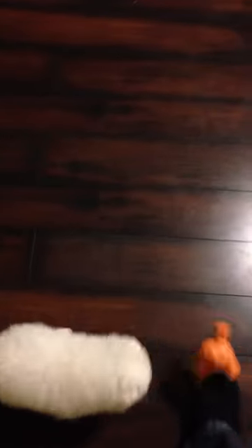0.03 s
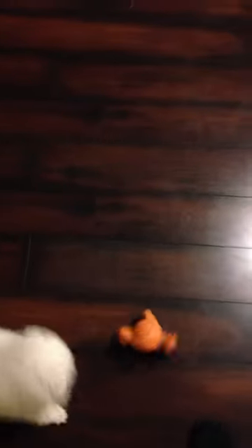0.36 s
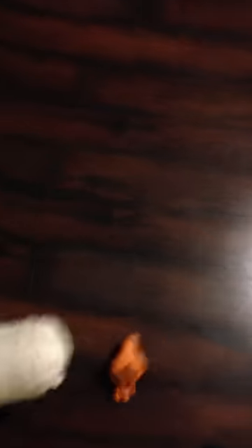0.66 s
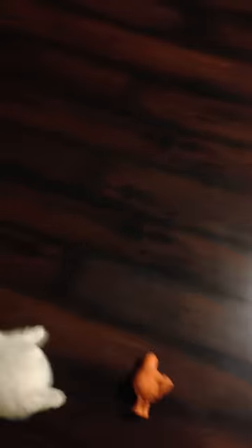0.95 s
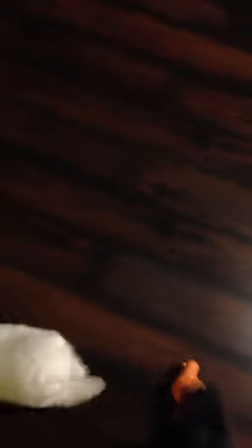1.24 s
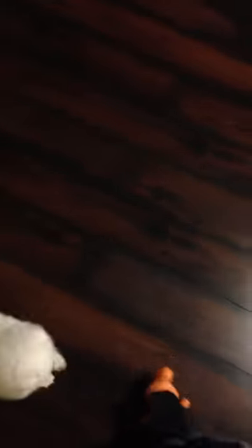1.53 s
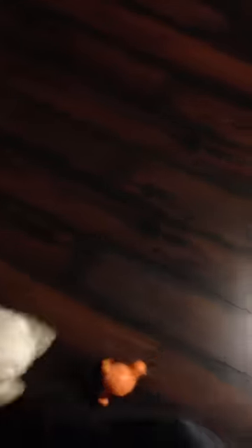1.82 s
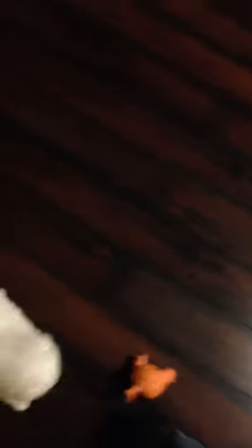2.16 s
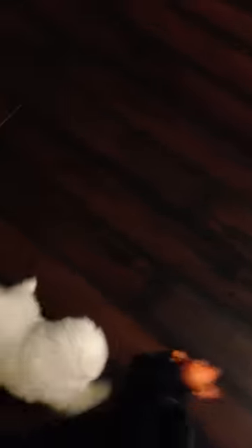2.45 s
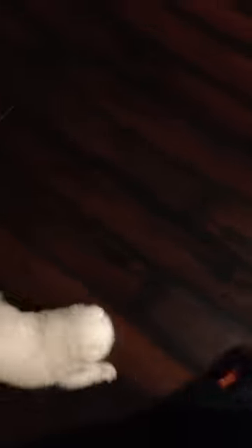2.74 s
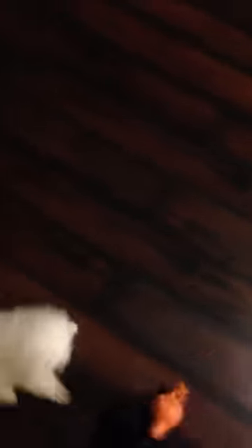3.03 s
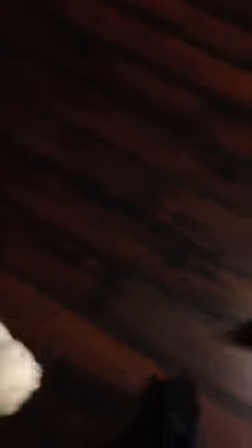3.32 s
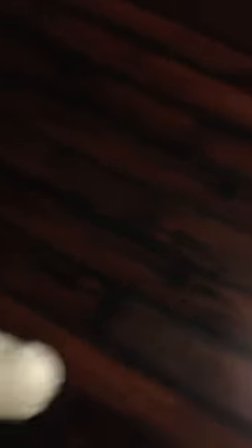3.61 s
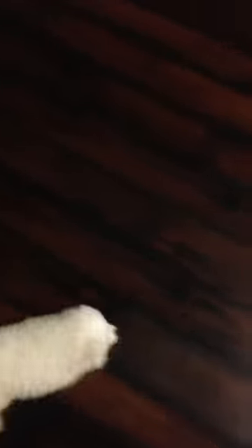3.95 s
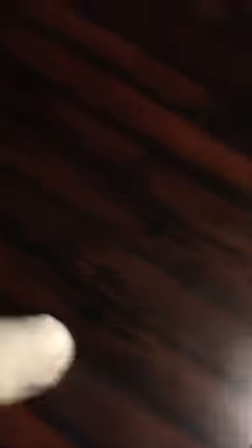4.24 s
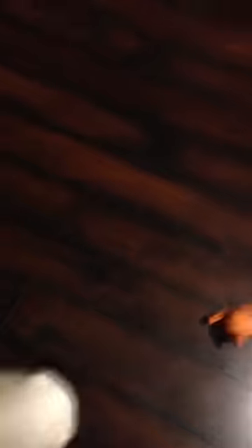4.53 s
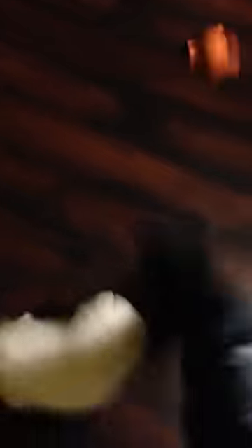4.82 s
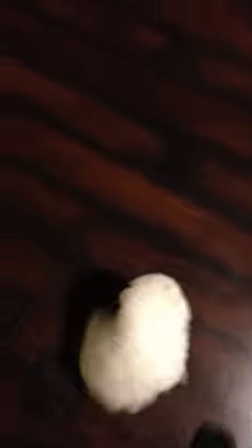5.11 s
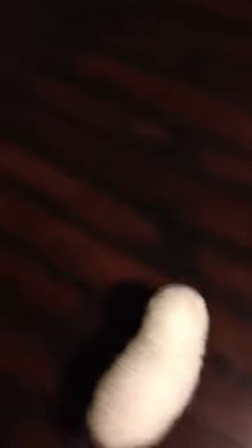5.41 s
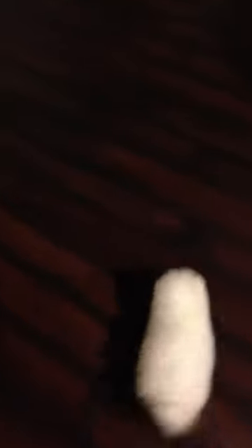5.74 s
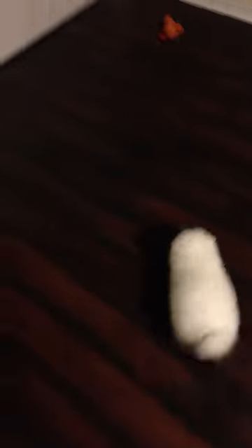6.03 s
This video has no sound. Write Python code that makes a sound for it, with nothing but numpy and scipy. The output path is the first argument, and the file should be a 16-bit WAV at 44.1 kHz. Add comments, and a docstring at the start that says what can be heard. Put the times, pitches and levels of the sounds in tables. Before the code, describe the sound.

From the start, short woody knocks come at an uneven pace as a puppy's paws, a foot and a soft rubber toy land on a laminate floor close by. Tiny bright claw ticks are scattered among them, along with soft scuffs and swishes of soles and fur. Faint, very short rubber chirps come around 1.5, 2.4 and 3.1 seconds. The knocks keep going until about 4 seconds, then thin out briefly. At about 4.7 seconds a kick makes one very brief, shrill squeak, the loudest sound, with a quick cluster of knocks. From 5.2 seconds to the end at about 6, the toy bounces away and the puppy gallops after it with heavier, duller thumps, the strongest near 5.8 seconds. The living room adds a short, light echo, and a faint, steady low room tone lies under everything.

```python
"""A living room with a laminate floor, where a puppy scampers after a soft rubber toy nudged by a foot.
Paws, foot and toy knock on the planks, which bend and thump the subfloor; claws tick on the hard finish.
Soles and fur scuff and swish, and rubber squeaks as it sticks and slips. A kick with one shrill squeak
sends the toy bouncing across the room, and the puppy gallops after it, over a low room tone."""
import sys
import numpy as np
from scipy import signal
from scipy.fft import rfft, irfft, next_fast_len
from scipy.io import wavfile
from scipy.ndimage import uniform_filter1d

SR = 44100
rng = np.random.default_rng(int(sys.argv[2]) if len(sys.argv) > 2 else 0)


def unload_wav(signal):
    """Save mono or channel-first audio to the path in sys.argv[1] as 16-bit WAV at rate SR, clipped to [-1, 1]."""
    wavfile.write(
        sys.argv[1],
        SR,
        np.round(np.clip(np.atleast_2d(signal).T, -1, 1) * 32767).astype(np.int16),
    )


N = 272080


def close_taps():
    """Paws, foot and toy land on the planks close by: short, woody knocks."""
    # contacts: start_s, level_db, pitch_hz, hardness_db, weight_db
    taps = [(.218, -23.5, 548, -32, -16), (.408, -32.5, 495, -38, -5), (.476, -30.5, 553, -29, -16),
            (1.039, -39.5, 750, -13, -9), (1.205, -35, 556, -14.5, -15), (1.361, -32, 580, -13.5, -17),
            (1.372, -36, 587, -12.5, -26), (1.499, -47.5, 920, 4, -25), (1.553, -43, 445, -16, -22),
            (1.688, -36, 578, -6, -29), (1.747, -43.5, 493, -6.5, -34), (1.805, -34, 376, -31, -14.5),
            (2.016, -28, 513, -20, -28), (2.055, -44, 434, -27, -18), (2.204, -42, 472, -32, -26),
            (2.25, -45.5, 583, -29, -28), (2.365, -37, 408, -30, -10), (2.441, -24, 442, -46, -18.5),
            (2.499, -37.5, 460, -28, -12.5), (2.747, -34.5, 482, -7, -14), (2.771, -38.5, 566, -12, -24),
            (2.896, -36, 580, -13, -37), (2.949, -31.5, 495, -25, -21), (2.963, -33, 436, -31, -16.5),
            (3.048, -40, 533, -26, -9), (3.112, -26.5, 612, -38, -12.5), (3.148, -27.5, 511, -19, -30),
            (3.257, -33.5, 410, -30, -26), (3.434, -43.5, 524, -18, -28), (3.581, -30, 431, -13.5, -17),
            (3.587, -33.5, 345, -13, -22), (3.743, -30.5, 389, -15.5, -23), (3.908, -36, 350, -24, -9),
            (3.968, -41, 595, -25, -20), (3.988, -33.5, 354, -26, -32), (4.048, -34, 463, -16.5, -10.5),
            (4.283, -45.5, 363, -37, -35), (4.402, -50, 537, -3, -10), (4.734, -31, 488, -17, -6),
            (4.79, -26, 423, -24, -5), (4.878, -36, 470, -19, -9), (4.964, -42, 400, -13, -5),
            (4.982, -39, 690, -9, -5), (5.013, -28, 326, -17, -3.5)]
    return knocks(taps, swell_s=0.0023, focus=1.0, slap_db=-6, slap_s=0.0043, edge_db=-5.5, edge_s=0.0072,
                  thud_db=-4, thud_s=0.006, send_db=-9.5, crack_send_db=5, thud_send_db=8)


def bounces_and_gallop():
    """The bouncing toy and the galloping puppy land with heavier, longer knocks."""
    # landings: start_s, level_db, pitch_hz, hardness_db, weight_db
    landings = [(5.217, -30, 687, -11.5, -33), (5.225, -28, 642, -20, -23), (5.286, -48, 633, -0.5, -37),
                (5.383, -33.5, 355.5, -28, -11), (5.431, -40, 342, -32, -26), (5.533, -38, 734, -4, -2.5),
                (5.548, -31.5, 222, -36, -20), (5.562, -39.5, 455, -6, -19), (5.773, -39, 278, -49, -4.5),
                (5.848, -22.5, 238, -28, -11), (6.0, -48, 596, -4, -3), (6.015, -40.5, 371, -38, -12)]
    return knocks(landings, swell_s=0.0049, focus=0.77, slap_db=-2.5, slap_s=0.007,
                  edge_db=-0.5, edge_s=0.007, thud_db=-2.5, thud_s=0.0058,
                  send_db=-8.5, crack_send_db=1.5, thud_send_db=10)


def knocks(contacts, swell_s, focus, slap_db, slap_s, edge_db, edge_s, thud_db, thud_s,
           send_db, crack_send_db, thud_send_db, trim_db=0.5):
    """Each contact bends a plank, thumps the subfloor and cracks; returns direct sound and room send."""
    # dense low modes of the subfloor: freq_hz, level_db
    thud_colour = [(60, -31.5), (110, -7.5), (150, 0.5), (220, -2.5), (330, -3), (430, -10), (700, -15),
                   (2000, -60.5)]
    # a flat sole or pad landing: freq_hz, level_db
    slap_colour = [(350, -24), (650, 7), (820, -9), (1100, -10), (1700, -14.5), (3000, -27), (8000, -49.5)]
    # the hard edge of a knock: freq_hz, level_db
    edge_colour = [(500, -23), (1000, -2.5), (1600, -3.5), (2800, -1.5), (4500, -9.5), (8000, -21.5),
                   (15000, -33.5)]
    t = np.arange(SR // 15) / SR
    direct, send = np.zeros(N), np.zeros(N)
    for start_s, level_db, pitch_hz, hardness_db, weight_db in with_settling(contacts):
        force_db = level_db + 34   # relative to an ordinary knock close by
        contact_s = swell_s * 2 ** (force_db / 42.5)   # a stronger blow stays in contact longer
        bend = plank(t, pitch_hz, contact_s, focus)
        thud = from_db(thud_db + weight_db) * swelling(t, thud_s) * noise(thud_colour, len(t))
        slap = from_db(slap_db + 0.35 * hardness_db) * burst(t, slap_colour, slap_s)
        edge = from_db(edge_db + hardness_db) * burst(t, edge_colour, edge_s)
        crack = slap + edge
        add(direct, start_s, from_db(level_db + trim_db) * (bend + thud + crack))
        wet_db = send_db - 0.23 * force_db   # fainter knocks are farther off, so wetter
        spill = bend + from_db(thud_send_db) * thud + from_db(crack_send_db) * crack
        add(send, start_s, from_db(level_db + trim_db + wet_db) * spill)
    low_cut = signal.butter(4, 150, "high", fs=SR, output="sos")   # the floor radiates no deep bass
    return signal.sosfilt(low_cut, np.array([direct, send]) + 1e-18)


def with_settling(contacts, settle_s=0.014, settle_db=-16):
    """Every contact settles with a second, lighter touch."""
    delays_s = settle_s * rng.uniform(0.7, 1.3, len(contacts))
    settling = [(start_s + delay_s, level_db + settle_db, *rest)
                for (start_s, level_db, *rest), delay_s in zip(contacts, delays_s)]
    return list(contacts) + settling


def plank(t, pitch_hz, swell_s, focus, lowest_hz=160, pad_hz=930):
    """A plank's heavily damped ring; more focus makes the main mode stand out."""
    # bending modes: pitch_ratio, level_db
    modes = [(.45, -15), (.68, -6), (1, 1), (1.48, -10.5), (2.2, -18.5)]
    out = 0
    for pitch_ratio, level_db in modes:
        mode_hz = pitch_hz * pitch_ratio ** rng.normal(1, 0.14)   # side modes shift with the spot struck
        # a soft pad hardly excites high modes, and the plank hardly rings at low ones
        reach = 1 / np.sqrt(1 + (mode_hz / pad_hz) ** 10 + (lowest_hz / mode_hz) ** 10)
        ring = swelling(t, swell_s) * np.sin(2 * np.pi * mode_hz * t)
        radiated = signal.lfilter(*signal.butter(2, mode_hz / 2, "high", fs=SR), ring)
        out = out + reach * from_db(focus * level_db) * radiated
    return out


def squeaks(rasp_db=-43, taper=0.21, stop_s=0.00399, flutter_hz=200.7):
    """Rubber sticks and slips; the pitch climbs and drops with the sliding speed, never quite evenly."""
    # rubber slips: start_s, length_s, climb_s, top_hz, glide_share (of the top pitch), level_db
    slips = [(1.363, 0.0046, 0.0011, 4130, 0.23, -41), (1.386, 0.041, .015, 9930, .45, -57),
             (1.494, .034, 0.0074, 7910, .14, -35.5), (1.503, 0.0086, 0.00016, 12400, .02, -56),
             (1.51, .008, 0.00016, 6100, 0.36, -35.5), (2.381, 0.0054, 0.00029, 3425, 0.33, -39),
             (2.399, 0.0071, .0002, 3620, 0.3, -48), (3.096, 0.006, 0.0016, 4400, 0.13, -39.5),
             (3.263, 0.00516, 0.00018, 3980, 0.5, -51.5), (4.7362, 0.0039, 0.0018, 4270, 0.24, -38.5),
             (4.7379, 0.0098, .0042, 13610, .32, -7.5), (4.753, 0.0057, 0.0018, 10750, 0.059, -12),
             (4.756, .0044, 0.00024, 9860, .21, -28.5)]
    out = np.zeros(N)
    for start_s, length_s, climb_s, top_hz, glide_share, level_db in slips:
        t = np.arange(int(length_s * SR)) / SR
        wobble, rasp = rng.standard_normal((2, SR // 10))[:, :len(t)]
        speed = np.clip(np.minimum(t / climb_s, (length_s - t) / stop_s), 0, 1)
        flutter = rms_one(uniform_filter1d(wobble, size=16))
        pitch_hz = top_hz * (1 - glide_share * (1 - speed)) + flutter_hz * flutter
        tone = np.sin(2 * np.pi * np.cumsum(pitch_hz) / SR) + from_db(rasp_db) * rasp
        add(out, start_s, from_db(level_db) * signal.windows.tukey(len(t), taper) * tone)
    return out


def rubs(grain_db=4.5, skirt_db=-4.5):
    """Each rub is a swell of tiny slips, coloured around one broad resonance."""
    # short strokes of sole, toy and fur: start_s, length_s, centre_hz, level_db
    strokes = [(0.214, 0.022, 1790, -53.5), (0.325, 0.067, 2470, -65), (0.481, 0.053, 3100, -58.5),
               (.62, 0.026, 6000, -75), (0.966, 0.084, 5500, -61.5), (1.385, .033, 4120, -48.5),
               (1.479, 0.047, 3320, -48), (1.499, 0.042, 6140, -45.5), (1.883, 0.093, 5770, -56.5),
               (2.38, 0.035, 3360, -49.5), (2.664, 0.045, 5330, -59.5), (3.075, 0.041, 3580, -52),
               (3.333, 0.056, 5750, -51), (3.622, .065, 4700, -49.5), (3.865, 0.041, 5800, -55.5),
               (3.927, 0.037, 4800, -52), (4.023, 0.075, 2560, -59), (4.223, 0.073, 4460, -58.5),
               (4.381, 0.065, 3400, -58.5), (4.666, 0.032, 5600, -56), (4.738, 0.014, 7300, -32.5),
               (4.739, 0.021, 3800, -44), (4.996, 0.057, 2850, -45.5), (5.214, 0.023, 2200, -51.5),
               (5.947, 0.058, 5670, -57.5)]
    out, size = np.zeros(N), SR // 5
    for start_s, length_s, centre_hz, level_db in strokes:
        swell = np.sqrt(np.hanning(int(length_s * SR)))
        colour = [(centre_hz / 8, -34), (centre_hz / 2, skirt_db), (centre_hz, 0),
                  (centre_hz * 0.98, -2), (centre_hz * 3.46, -17), (centre_hz * 4, -30)]
        slips = rms_one(noise(colour, size) * from_db(grain_db * grain(size, smooth_samples=64)))
        add(out, start_s, from_db(level_db) * swell * slips[:len(swell)])
    return out


def claws(trim_db=-1.5, decay_s=0.0033):
    """Tiny bright ticks of nails on the hard finish."""
    # nail strikes: start_s, level_db
    ticks = [(0.548, -53), (0.619, -51), (1.04, -46), (1.2055, -45.5), (1.367, -51), (1.683, -47),
             (2.0176, -39.5), (2.549, -50), (2.7483, -41.5), (3.15, -43), (3.872, -39), (4.47, -53),
             (4.982, -49), (5.533, -46)]
    # colour of a tick: freq_hz, level_db
    tick_colour = [(1500, -9), (4000, -0.5), (8000, -3.5), (13000, -4), (16000, -16.5)]
    t, out = np.arange(SR // 20) / SR, np.zeros(N)
    for start_s, level_db in ticks:
        add(out, start_s, from_db(level_db + trim_db) * burst(t, tick_colour, decay_s))
    return out


def sliding(trim_db=-1.5, grain_db=1.14):
    """Friction hiss, grainy as the surfaces catch and let go."""
    # soles and fur sliding on the floor: time_s, scuff_db, swish_db
    levels = [(0.0, -65.5, -65.5), (0.39, -64, -67), (0.88, -66, -65.5), (1.42, -67.5, -64.5),
              (1.54, -69, -63.5), (1.97, -62, -60), (2.16, -63, -65.5), (2.4, -71, -65), (3.26, -58.5, -62),
              (3.44, -61, -65.5), (3.66, -72, -64.5), (3.8, -59.5, -57), (4.29, -63, -63),
              (4.74, -61.5, -59.5), (4.9, -62, -62.5), (5.22, -62.5, -62.5), (5.36, -67, -64),
              (6.17, -68, -66.5)]
    # the midrange scuff: freq_hz, level_db
    scuff_colour = [(300, -4), (900, -2.5), (1400, -4.5), (2700, 1.5), (4500, -5.5), (7000, -18),
                    (15000, -39)]
    # the airy swish: freq_hz, level_db
    swish_colour = [(2500, -7), (5500, -1.5), (9000, -4.5), (13000, -6), (16000, -6)]
    time_s, scuff_db, swish_db = np.transpose(levels)
    t = np.arange(N) / SR
    catching = from_db(trim_db + grain_db * grain(N, smooth_samples=300))
    scuff = from_db(np.interp(t, time_s, scuff_db)) * noise(scuff_colour)
    swish = from_db(np.interp(t, time_s, swish_db)) * noise(swish_colour)
    return catching * (scuff + swish)


def room(send, tail_db=-27, build_s=0.0035):
    """A few dull early echoes, then a diffuse tail that dies band by band."""
    # time for the tail to fall 60 dB: freq_hz, decay_s
    decays = [(150, 0.49), (400, 0.39), (1000, 0.42), (2800, 0.39), (6000, 0.39), (12000, 0.19)]
    # reflections off furniture, ceiling and wall: delay_s, gain
    echoes = [(.0085, 0.23), (0.0136, .45), (0.028, .25)]
    t = np.arange(SR * 3 // 4) / SR
    hz, white = np.fft.rfftfreq(len(t), 1 / SR), rfft(rng.standard_normal(len(t)))
    centres_hz, decays_s = np.transpose(decays)
    response = np.zeros(len(t))
    for decay_s, weights in zip(decays_s, np.eye(len(decays))):
        band = at_hz(np.column_stack([centres_hz, weights]), hz)
        response += irfft(white * band, len(t)) * np.exp(-np.log(1000) * t / decay_s)
    response *= from_db(tail_db) * (1 - np.exp(-(t / build_s) ** 2))
    smear = np.hanning(9)   # dulls each echo
    for delay_s, gain in echoes:
        add(response, delay_s, gain * smear / smear.sum())
    return signal.fftconvolve(send, response)[:N]


def room_tone(level_db=-64):
    """A faint, steady bed of low noise."""
    # low background of the room: freq_hz, level_db
    colour = [(25, -24), (60, -19.5), (95, -23.5), (125, -2.5), (160, -1.5), (230, -4), (400, -5),
              (650, -10), (1000, -15.5), (1600, -22), (4000, -52)]
    return from_db(level_db) * noise(colour)


def burst(t, colour, decay_s):
    """A coloured crack that dies at once."""
    return noise(colour, len(t)) * np.exp(-t / decay_s)


def swelling(t, swell_s):
    """An envelope that rises to 1 within the swell time and soon dies."""
    progress = t / swell_s
    return (progress * np.exp(1 - progress)) ** 2


def grain(size, smooth_samples):
    """A fast random flicker, rms 1."""
    return rms_one(uniform_filter1d(rng.standard_normal(size), size=smooth_samples))


def noise(colour, size=N):
    """Noise of a given colour, rms 1."""
    padded = next_fast_len(size, real=True)
    gains = from_db(at_hz(colour, np.fft.rfftfreq(padded, 1 / SR)))
    white = rfft(rng.standard_normal(padded))
    return rms_one(irfft(white * gains, padded)[:size])


def at_hz(points, hz):
    """Read a table on a log-frequency axis."""
    points = np.array(points)
    return np.interp(np.log(hz + 1e-9), np.log(points[:, 0]), points[:, 1])


def from_db(db):
    """Decibels to gain."""
    return 10 ** (np.asarray(db) / 20)


def rms_one(x):
    """Scale to rms 1."""
    return x / np.sqrt(np.mean(x ** 2) + 1e-20)


def add(track, start_s, sound):
    """Mix a sound into a track at a time."""
    i = int(start_s * SR)
    track[i:i + len(sound)] += sound[:N - i]


def scene():
    """Knocks, ticks, squeaks and rubs in the room, over a bed of sliding and room tone."""
    bed = room_tone() + sliding()
    ticks = claws()
    friction = squeaks() + rubs()
    bounces, bounces_send = bounces_and_gallop()
    taps, taps_send = close_taps()
    reverb = room(taps_send + bounces_send + ticks + from_db(-6) * friction)
    return (taps + bounces + ticks + friction + reverb + bed)[None]


def record(dry, low_cut_hz=60, high_cut_hz=15300):
    """A small microphone that loses the bass; the top is cut steeply."""
    thin = signal.sosfilt(signal.butter(2, low_cut_hz, "high", fs=SR, output="sos"), dry)
    return signal.sosfilt(signal.ellip(10, 0.1, 80, high_cut_hz, fs=SR, output="sos"), thin)


dry = scene()
out = record(dry)
unload_wav(out)
```